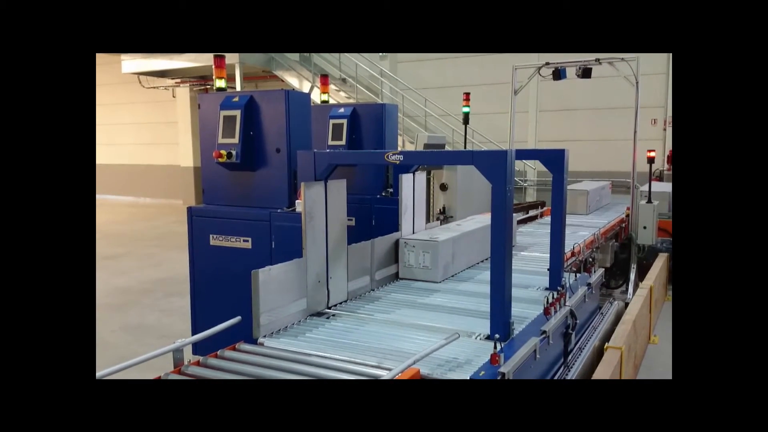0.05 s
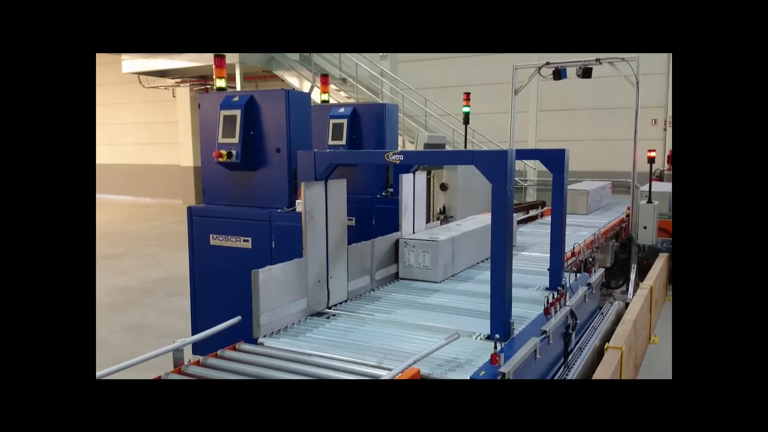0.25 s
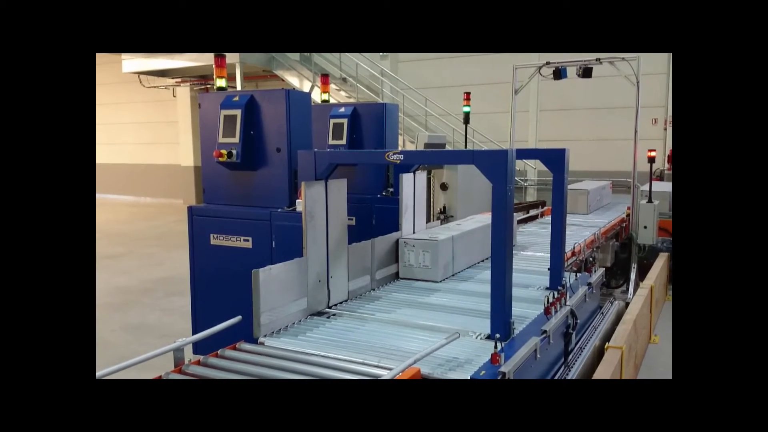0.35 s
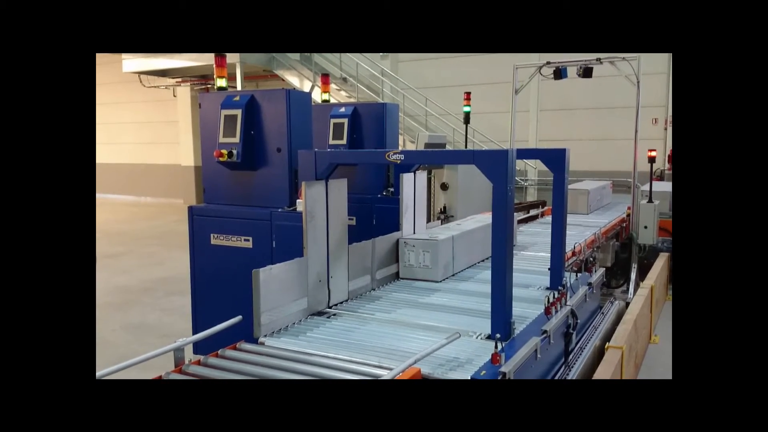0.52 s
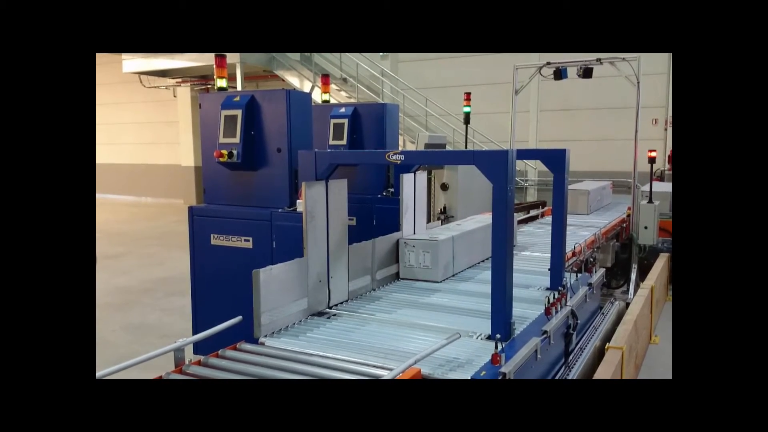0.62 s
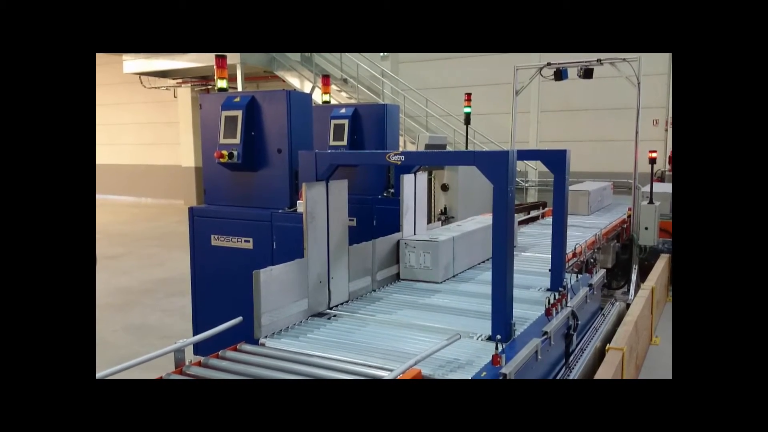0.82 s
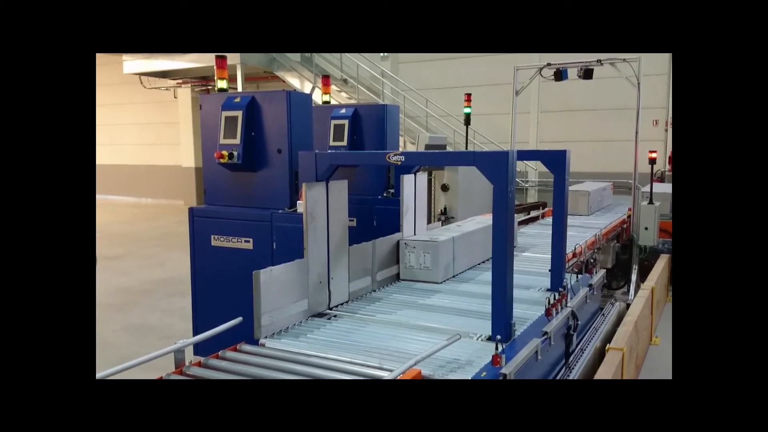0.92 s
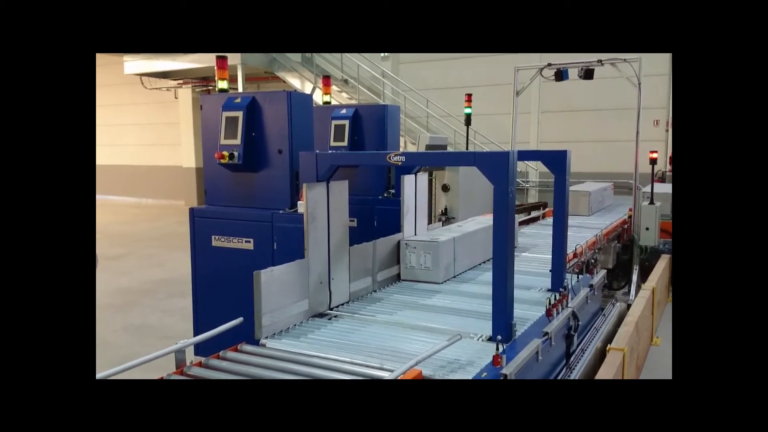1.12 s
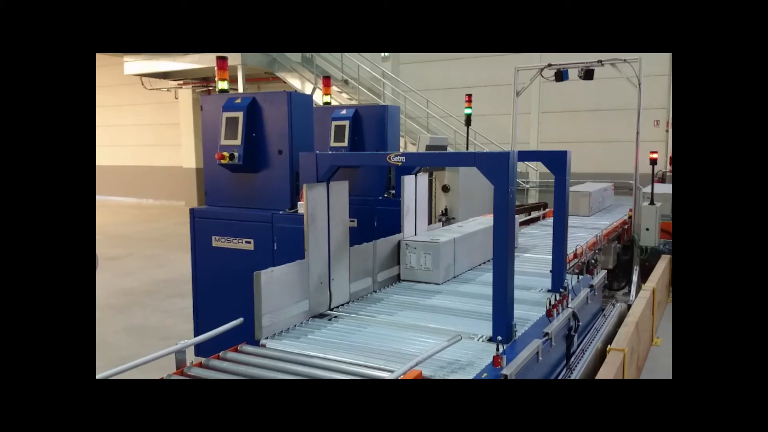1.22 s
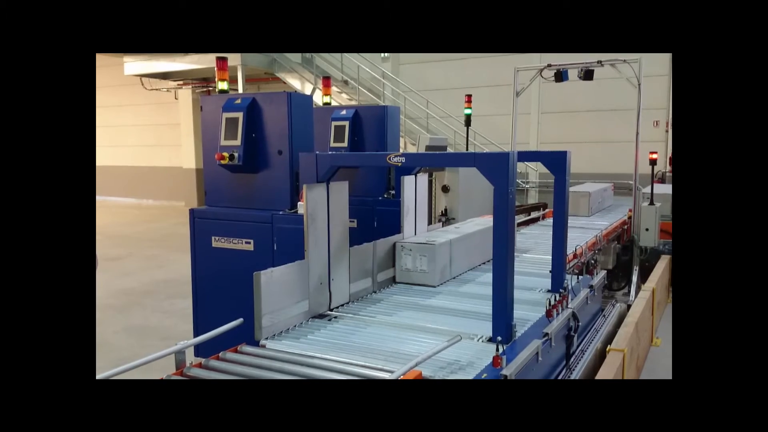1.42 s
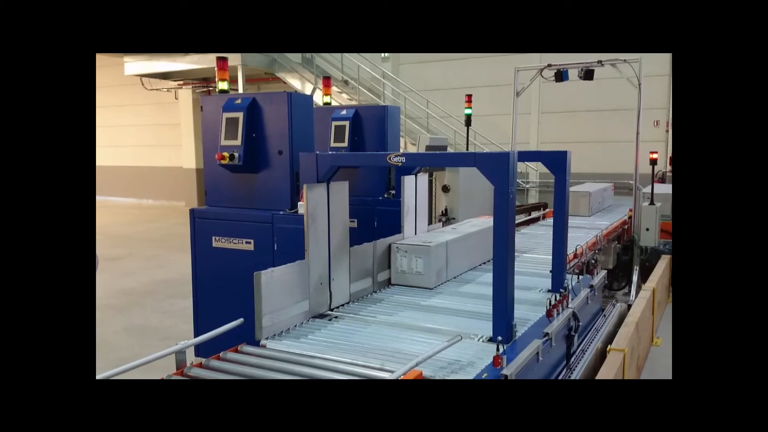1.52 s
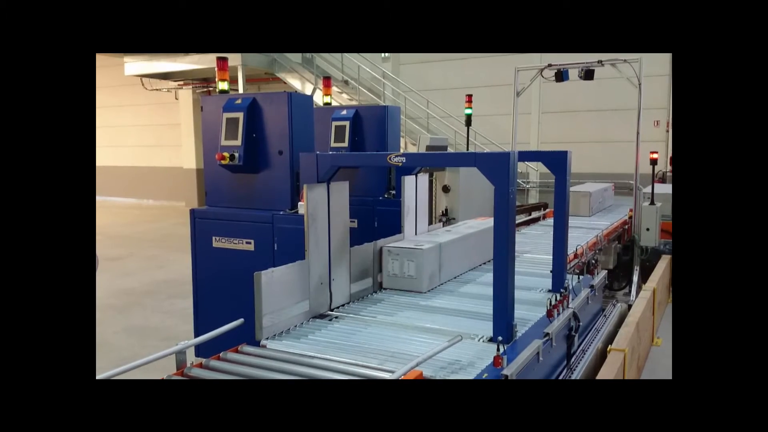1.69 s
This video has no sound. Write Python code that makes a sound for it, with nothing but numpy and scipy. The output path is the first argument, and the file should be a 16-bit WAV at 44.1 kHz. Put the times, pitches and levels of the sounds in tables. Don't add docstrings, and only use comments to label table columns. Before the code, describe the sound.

A strapping machine whines up, scrapes its strap and slams, clacking over a low roller rumble.

```python
import sys
import numpy as np
from scipy import signal
from scipy.fft import rfft, irfft
from scipy.io import wavfile
from scipy.ndimage import uniform_filter1d

SR = 44100
rng = np.random.default_rng(int(sys.argv[2]) if len(sys.argv) > 2 else 0)


def unload_audio(sound):
    columns = np.transpose(np.atleast_2d(sound))
    steps = np.round(np.clip(columns, -1, 1) * 32767)
    wavfile.write(sys.argv[1], SR, steps.astype(np.int16))


def attenuation_scalar(level_db):
    decades = np.asarray(level_db, float) / 20
    return 10 ** decades


N = 77175
T = np.arange(N) / SR
HZ = np.maximum(np.arange(N // 2 + 1) * SR / N, 1)
SPREAD = 0.057


def table(points, hz=HZ):
    p = np.array(points)
    return np.interp(np.log(hz), np.log(p[:, 0]), p[:, 1])


def unit(x):
    return x / np.sqrt(np.mean(x ** 2))


def colour(x, gain):
    return irfft(rfft(x) * gain / np.sqrt(np.mean(np.abs(gain) ** 2)), N)


def peak(hz, width_hz):
    return 1 / (1 + 1j * (HZ / hz - hz / HZ) * hz / width_hz)


def walk(rate_hz):
    k = int(SR / rate_hz)
    once = uniform_filter1d(rng.standard_normal(N), k)
    return unit(uniform_filter1d(once, k))


def grit(spread_db):
    size = np.minimum(rng.exponential(size=N), 5)
    return unit(rng.standard_normal(N) * attenuation_scalar(spread_db * size))


def burst(start_s, hold_s, t60_s, attack_s=.0015):
    since = T - start_s
    sag_db = 6 * np.clip(since / hold_s, 0, 1)
    release_db = 60 * np.clip(since - hold_s, 0, 1) / t60_s
    return np.clip(since / attack_s, 0, 1) * attenuation_scalar(-release_db - sag_db)


def place(x, pan_db):
    return x * attenuation_scalar(np.array([[pan_db], [-pan_db]]) / 2)


def pair(x, spread=1):
    # frequency in Hz, likeness of the ports from 0 to 1.
    likeness = [(30, 0.84), (250, 1), (600, 0.71), (1500, 0), (4000, 0), (15000, 0)]
    like = np.clip(table(likeness), 0, 1) ** spread
    common = rfft(x[0]) * np.sqrt((1 + like) / 2)
    differ = rfft(x[1]) * np.sqrt((1 - like) / 2)
    return irfft(np.array([common + differ, common - differ]), N)


def rough_tone(phase, k):
    smear_hz = 300 * np.sqrt(k)
    core = (.4 + walk(smear_hz)) * np.sin(k * phase)
    return core + walk(smear_hz) * np.cos(k * phase)


def feed():
    # time in seconds, tooth rate in Hz, scrape level in dB, whine level in dB.
    runs = [
        [(.03, 1060, -86, -86), (.11, 1280, -51, -56), (.21, 1480, -38, -62), (.25, 1704, -34, -49),
         (.29, 1909, -36.5, -49), (.35, 1915, -37.5, -48), (.40, 2000, -37.5, -46), (.47, 1973, -31, -46),
         (.49, 1967, -73, -90)],
        [(.76, 1470, -86, -99), (.82, 1497, -48.5, -99), (1.0, 1500, -54.5, -99), (1.07, 1390, -69, -99),
         (1.12, 1390, -90, -99)],
        [(1.63, 1612, -82, -83), (1.68, 1800, -46, -70), (1.705, 1900, -42, -62), (1.72, 2010, -44, -57),
         (1.738, 2140, -42, -54), (1.76, 2230, -40, -53)],
    ]
    # multiple of the tooth rate, level in dB.
    gear = [(1, -5), (2, 0), (3, -8), (4, -6), (6, -24)]
    # time in seconds, multiple, extra level in dB, length in seconds.
    bites = [(0.245, 4, 15, .015), (0.26, 2, 12, 0.008), (0.266, 1, 3, .015), (0.328, 2, 14, 0.0068),
             (0.337, 4, 14, 0.0093), (.35, 2, 7.5, .008), (0.38, 4, 8, 0.0062), (0.405, 2, 3, 0.0084),
             (0.396, 3, 13, 0.009), (0.429, 2, 11, 0.0027), (0.446, 4, 13, 0.011), (0.353, 1, 7.5, 0.028),
             (0.45, 2, -6, 0.0096), (.466, 2, 14, 0.005), (1.695, 3, 4, .01), (1.734, 2, 3, .008),
             (1.746, 1, 6, 0.0058)]
    # frequency in Hz, gain in dB per Hz.
    scrape_spectrum = [(300, -22), (1000, -7.5), (2000, -1.5), (3500, 2), (6000, 10), (9000, -0.5),
                       (13000, 1), (16000, 1.5)]
    patch_db, walk_db, bright_db, bright_hz = 3, 1, 41, 6500

    time_s, tooth_hz, scrape_db, whine_db = np.vstack([np.array(run) for run in runs]).T
    rate_hz = np.interp(T, time_s, tooth_hz)
    phase = 2 * np.pi * np.cumsum(rate_hz * (1 + .007 * walk(52))) / SR
    whine = 0
    for k, db in gear:
        bite_db = 0
        for at_s, multiple, extra_db, span_s in bites:
            if round(multiple) == k:
                bite_db = bite_db + extra_db * np.exp(-((T - at_s) / span_s) ** 2)
        whine = whine + attenuation_scalar(db + bite_db + patch_db * walk(66)) * rough_tone(phase, k)

    contacts = np.array([grit(1.5), grit(0.49)])
    scrape = pair(colour(contacts, attenuation_scalar(table(scrape_spectrum))), SPREAD) * attenuation_scalar(walk_db * walk(36))
    low = irfft(rfft(scrape) / (1 + (HZ / bright_hz) ** 4), N)
    treble_db = bright_db * np.minimum(rate_hz / 1900 - 1, 0)
    scrape = low + (scrape - low) * attenuation_scalar(treble_db)
    return whine * attenuation_scalar(np.interp(T, time_s, whine_db)), scrape * attenuation_scalar(np.interp(T, time_s, scrape_db))


def squeak():
    start_s, base_hz, rise_hz, level_db = 1.668, 1950, 250, -47
    hz = base_hz + rise_hz * np.clip((T - start_s) / 0.01, 0, 1)
    tone = np.sin(2 * np.pi * np.cumsum(hz) / SR)
    return attenuation_scalar(level_db + 2 * walk(150)) * tone * burst(start_s, .016, 0.03, 0.0022)


def clacks():
    # start in seconds, level in dB, ring in Hz, rattle length in seconds, ring level in dB.
    hits = [(0.1, -48.5, 3550, 0.015, 1), (0.11, -40.5, 4500, 0.014, -1), (0.147, -37, 3800, 0.012, -6),
            (0.189, -33.5, 3700, 0.0076, 3), (0.434, -29.5, 1250, 0.0024, -7),
            (0.443, -31.5, 5400, 0.009, 0), (0.474, -21.5, 6300, 0.0069, -1.5),
            (0.4743, -21, 13200, 0.0028, 7), (.476, -18, 5800, 0.0036, 1.5),
            (0.4786, -14.5, 1990, 0.003, -17), (0.49, -30, 4600, 0.011, -18),
            (0.49, -37.5, 1860, 0.0087, -4), (0.719, -32, 5600, 0.033, -3), (0.777, -32.5, 4380, 0.0094, 1),
            (0.788, -38.5, 6060, .025, 3), (0.875, -42.5, 990, 0.029, 1.5), (0.96, -43, 2660, 0.037, -11),
            (1.312, -39, 5900, .004, -22), (1.326, -27.5, 6900, 0.0033, 10),
            (1.328, -27, 3770, 0.012, -10.5), (1.584, -36, 4600, 0.0089, 2), (1.585, -40.5, 5700, 0.02, -7),
            (1.602, -44, 5170, 0.056, -7)]
    # frequency in Hz, gain in dB per Hz.
    clack_spectrum = [(100, -0.5), (600, -2), (2000, -1), (4000, 2), (6500, 8), (9000, -16.5),
                      (13000, -11.5), (16000, -59)]
    # frequency in Hz, level in dB.
    frame_modes = [(774, 14.5), (1362, 12.5), (2060, 22), (3700, 17), (4485, 8.5), (7260, -1), (8680, 13.5)]
    frame_db, dull_db, send_db, hardest_db = -9.5, 0.44, 0, -20
    ring_q, frame_width_hz, scatter = 5, 220, .03

    contact = attenuation_scalar(table(clack_spectrum))
    out, plain = 0, 0
    for start_s, db, hz, hold_s, ring_db in hits:
        frame = 0
        for mode_hz, mode_db in frame_modes:
            shifted_hz = mode_hz * (1 + scatter * rng.standard_normal())
            frame = frame + attenuation_scalar(mode_db) * peak(shifted_hz, frame_width_hz)
        hit = np.array([grit(3), grit(1.1)]) * burst(start_s, hold_s, .03 + 3 * hold_s)
        dull = attenuation_scalar(dull_db * (db - hardest_db) * np.log2(1 + (HZ / 7000) ** 3))
        body = dull * (contact + attenuation_scalar(frame_db) * frame)
        ring = peak(hz, hz / ring_q)
        gain = body / np.std(body) + attenuation_scalar(ring_db) * ring / np.std(ring)
        out = out + attenuation_scalar(db) * colour(hit, gain)
        plain = plain + attenuation_scalar(db + send_db) * colour(hit, dull * contact)
    return pair(out, SPREAD), pair(plain, SPREAD)


def thuds():
    # start in seconds, level in dB, body in Hz, length in seconds.
    blows = [(.0, -51.5, 330.3, 0.16), (0.145, -50, 207, 0.042), (0.472, -36.5, 521, 0.017),
             (0.496, -32.5, 815, 0.0071), (0.49, -66, 46, 0.0089), (0.532, -47, 322.5, 0.082),
             (0.713, -36.5, 488, 0.014), (0.728, -45.5, 295, 0.02), (0.767, -40.5, 229, 0.017),
             (0.806, -37, 265, 0.02), (0.833, -42, 487, 0.0038), (0.922, -42.5, 380, 0.017),
             (0.985, -52, 311, 0.005), (1.101, -66.5, 88.3, 0.11), (1.138, -59.5, 44.7, 0.185),
             (1.316, -63, 674, 0.0043), (1.633, -50, 141, 0.033), (1.47, -49.5, 344, 0.029),
             (1.617, -42.5, 290, 0.0049), (1.636, -43.5, 309, 0.047), (1.67, -49, 295, 0.11)]
    t60_s, kick_db, ring_db, body_db, body_q, short_hz = 0.054, 2.5, 1, -13, 5.5, 300
    out = 0
    for start_s, db, hz, hold_s in blows:
        envelope = burst(start_s, hold_s, t60_s)
        kick = min(hz / short_hz, 1) ** 2 * np.exp(-((T - start_s - .001) * hz * 6) ** 2)
        hit = grit(0.69) * envelope + attenuation_scalar(kick_db) * kick
        ring = attenuation_scalar(ring_db) * np.sin(-2 * np.pi * hz * (T - start_s)) * envelope
        struck = colour(hit, peak(hz, hz / body_q)) / 2
        crate = attenuation_scalar(body_db) * colour(hit, peak(363, 500) ** 2)
        out = out + attenuation_scalar(db) * (ring + struck + crate)
    return out


def valve():
    # frequency in Hz, gain in dB per Hz.
    air = [(800, -3), (2000, -2.5), (4000, -2.5), (6000, 6), (9000, -5.5), (13000, -3.5), (16000, 0)]
    opens_s, closes_s, close_t60_s = 1.268, 1.49, 7 * 0.072
    spit_db, spit_hz, spit_t60_s, flow_db = -45, 8800, 0.048, -41.5
    spit = colour(grit(0.48), peak(spit_hz, 2200) ** 2)
    spit = spit * burst(opens_s, 0.013, spit_t60_s) * attenuation_scalar(spit_db)
    flow = pair(colour(np.array([grit(0.79), grit(4.2)]), attenuation_scalar(table(air))), SPREAD)
    flow = flow * burst(opens_s, closes_s - opens_s, close_t60_s) * attenuation_scalar(flow_db + 0.4 * walk(25))
    return place(spit, -1) + place(flow, -0.5)


def conveyor():
    # frequency in Hz, gain in dB per Hz.
    rumble = [(25, -10), (100, -5.5), (300, -0.5), (1000, -3.5), (3300, -13.5), (4600, -31), (10500, -40),
              (13500, -60)]
    # hum in Hz, level in dB.
    rollers = [(205, -65), (343, -62), (430, -83.5), (550, -69)]
    rumble_db = -51
    out, swell_db = 0, walk(1.3)
    for hz in 28 * 2 ** np.arange(0, 9.2, .5):
        band = np.array([colour(grit(1.0), peak(hz, hz / 2.0) ** 4) for _ in range(2)])
        band_db = table(rumble, hz) + 10 * np.log10(hz)
        out = out + band * attenuation_scalar(band_db + swell_db + 1.8 * walk(1.4))
    out = unit(out) * attenuation_scalar(rumble_db)
    for hz, db in rollers:
        out[0] += attenuation_scalar(db) * colour(rng.standard_normal(N), peak(hz, 18.7) ** 2)
    return pair(out)


def inverter():
    # frequency in Hz, level in dB.
    lines = [(11892, -82), (11967, -78), (12037, -73)]
    hiss_db, hiss_hz, hiss_width_hz, slip_rad = -74, 12140, 300, 1.2
    song = 0
    for hz, db in lines:
        song = song + attenuation_scalar(db + walk(21)) * np.sin(2 * np.pi * hz * T + slip_rad * walk(40))
    hiss = attenuation_scalar(hiss_db) * colour(rng.standard_normal(N), peak(hiss_hz, hiss_width_hz) ** 2)
    return place(song + hiss, 5.2)


def hall(x):
    # frequency in Hz, t60 in seconds.
    hall_t60 = [(125, 1.73), (500, 1.47), (2000, 2.5), (3500, 1.53), (5000, 1.01), (8000, 1.07),
                (11000, 0.84), (15000, 0.5)]
    late_db, gap_s, early_db, early_t60_s = -5.5, 0.012, -7, .06
    tail = 0
    for hz in 45 * 2 ** np.arange(0, 8.6, .5):
        band = np.array([colour(rng.standard_normal(N), peak(hz, hz / 2) ** 2) for _ in range(2)])
        late = attenuation_scalar(late_db - 60 * T / table(hall_t60, hz)) * np.sqrt(2 * np.log(1000) / 2 / SR)
        late = late * np.clip(T / gap_s - 1, 0, 1)
        early = attenuation_scalar(early_db - 60 * T / early_t60_s) * np.sqrt(2 * np.log(1000) / early_t60_s / SR)
        tail = tail + band * (late + early) * np.sqrt(hz / SR)
    return signal.fftconvolve(pair(tail), x, axes=1)[:, :N]


def scene():
    whine_send_db = -10
    whine, scrape = feed()
    whine = place(whine + squeak(), -0.81)
    rings, blows = clacks()
    near = scrape + thuds() + valve()
    echoes = hall(near + blows + attenuation_scalar(whine_send_db) * whine)
    return near + rings + whine + echoes + conveyor() + inverter()


def roll_off(x):
    return signal.sosfilt(signal.butter(12, 16020, fs=SR, output="sos"), x)


def record(dry):
    # frequency in Hz, gain in dB.
    mic = [(100, 1), (7000, 5), (10500, 1.5), (13000, 3), (14500, -1), (16000, -11)]
    # frequency in Hz, left minus right in dB.
    port_db = [(60, -1), (110, 1.5), (200, 4), (380, 4), (700, 2.5), (1290, 5), (2380, 1.5), (4400, 4),
               (8120, -8), (15000, -5.5)]
    # frequency in Hz, lead of the left port in radians.
    port_rad = [(30, 1.1), (250, 0.53), (1000, 0.52), (3000, 0.25), (6000, 0.51), (15000, 1.84)]
    top_hz = 16000
    tilt = attenuation_scalar(table(port_db) / 2) * np.exp(.5j * table(port_rad))
    response = attenuation_scalar(table(mic)) * (HZ < top_hz) * np.array([tilt, 1 / tilt])
    return roll_off(irfft(rfft(dry) * response, N))


dry = scene()
out = record(dry)
unload_audio(out)
```